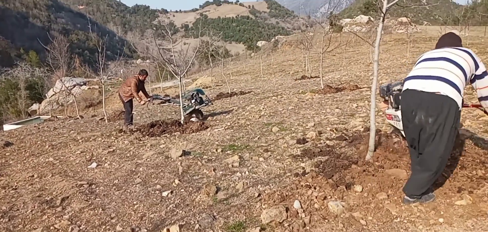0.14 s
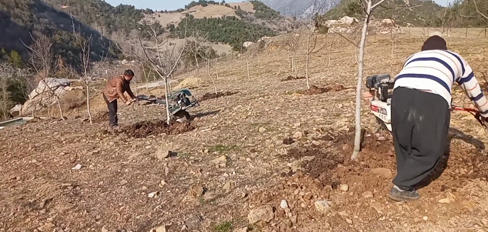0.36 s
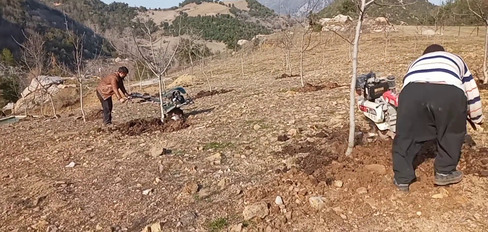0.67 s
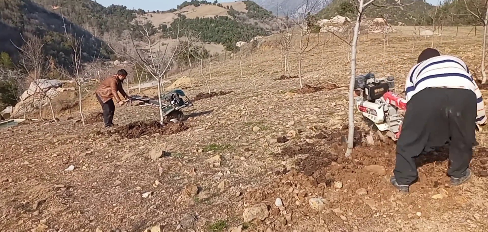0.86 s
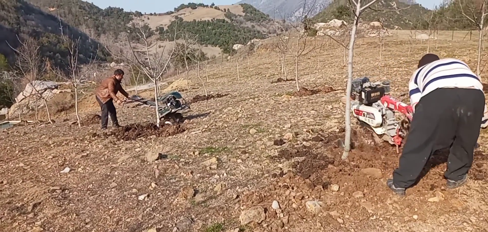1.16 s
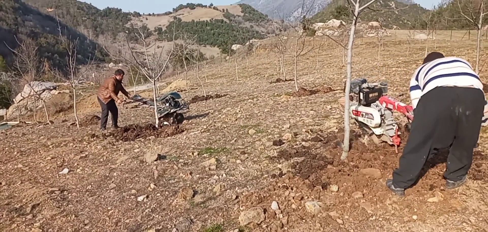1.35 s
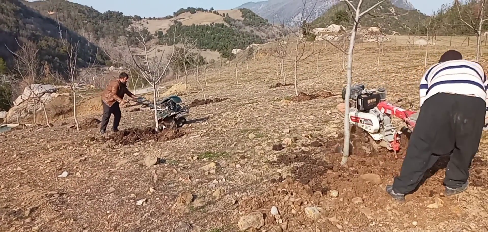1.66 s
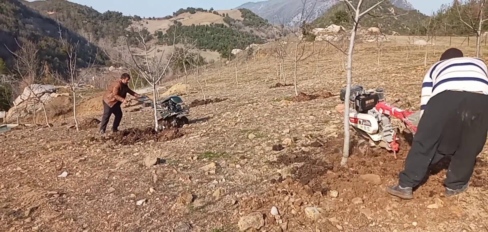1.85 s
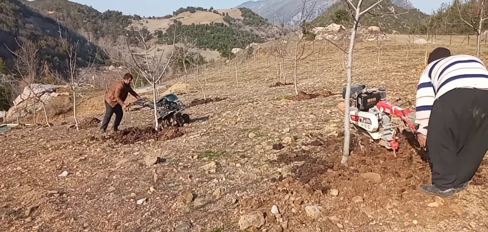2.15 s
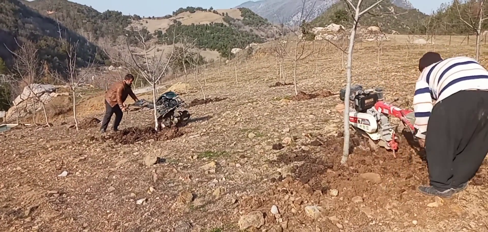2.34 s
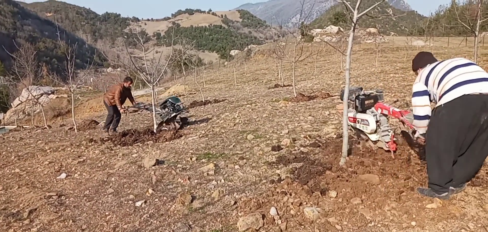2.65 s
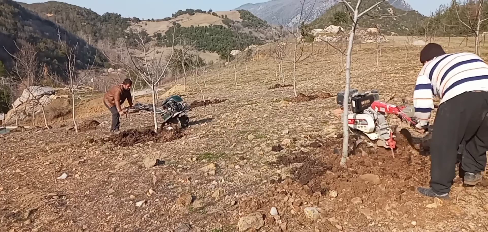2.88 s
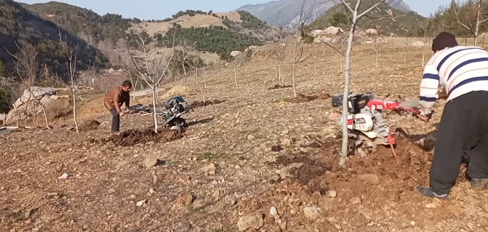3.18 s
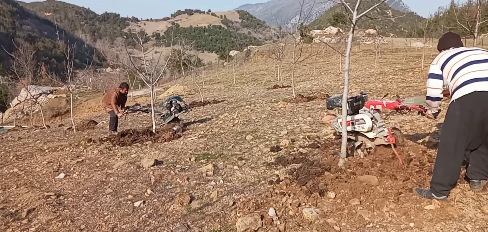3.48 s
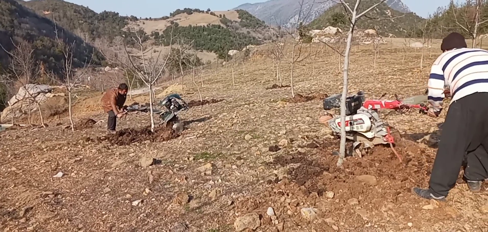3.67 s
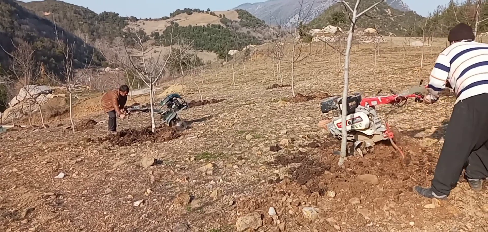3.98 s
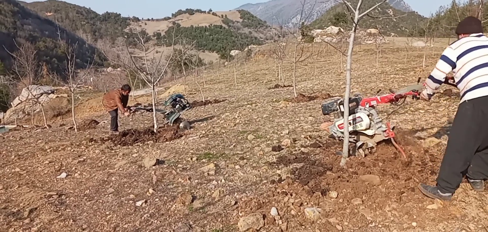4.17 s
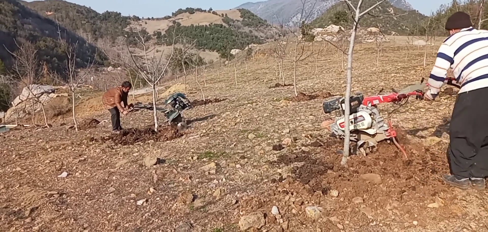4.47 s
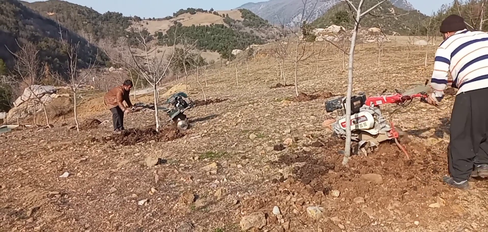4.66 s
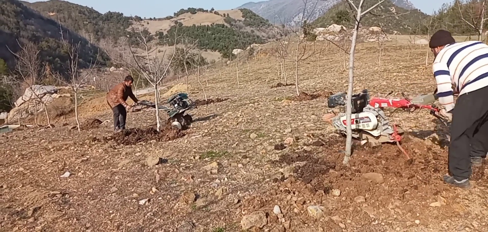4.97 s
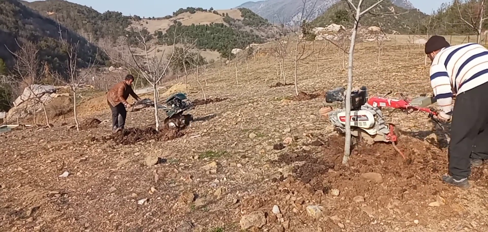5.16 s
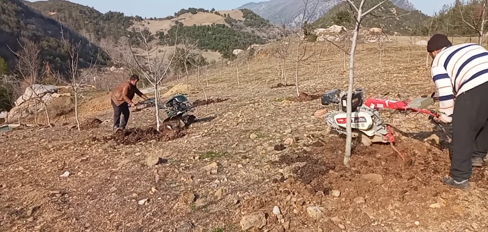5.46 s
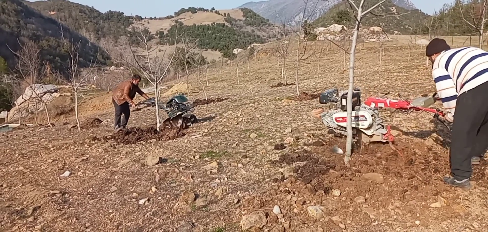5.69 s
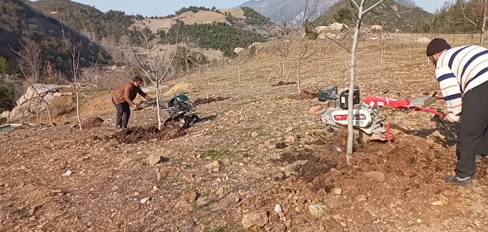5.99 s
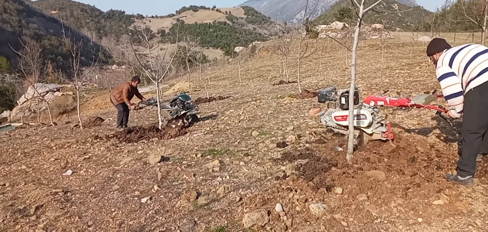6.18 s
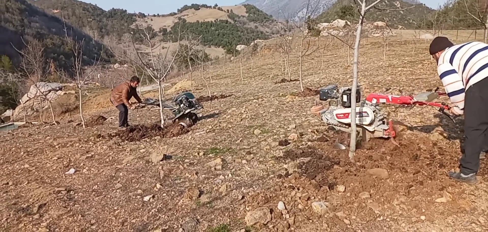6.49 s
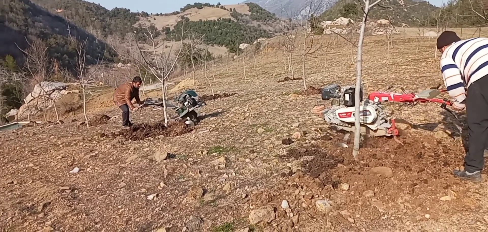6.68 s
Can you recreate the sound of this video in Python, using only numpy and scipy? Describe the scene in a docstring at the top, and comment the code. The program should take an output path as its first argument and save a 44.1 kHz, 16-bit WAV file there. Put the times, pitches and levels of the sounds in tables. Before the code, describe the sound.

Outdoors, a close tilling machine drones without pause, its rapid exhaust puffs fused into a rough low hum with dry casing clatter on top. Grainy earth hisses constantly, swelling in short crunches, with small steel clinks scattered irregularly. Behind it a second tiller wavers slightly in speed, so the two drones beat together. Diffuse roar off the slope fills the background; handheld stereo pickup.

```python
"""A stony hillside dug by two small single-cylinder four-stroke tillers, one near and one far. The near one
fires steadily: exhaust puffs sound through its pipe, and knock and rattle ring its casing as it swings round a
tree. The far one hunts under load, and its exhaust carries across. Soil hisses over the tines, clods burst,
stones make the steel clink, and the slope returns a blurred roar."""
import sys
import numpy as np
from scipy import signal
from scipy.fft import rfft, irfft, next_fast_len
from scipy.io import wavfile
from scipy.ndimage import uniform_filter1d

SR = 44100
rng = np.random.default_rng(int(sys.argv[2]) if len(sys.argv) > 2 else 0)


def materialize(psi):
    """Save the field psi as 16-bit PCM at rate SR to the path in sys.argv[1].

    A 1-D psi becomes a single channel; in a 2-D psi each row is a channel.
    """
    bounded = np.clip(np.atleast_2d(psi).T, -1, 1)
    quanta = np.round(bounded * 32767).astype(np.int16)
    wavfile.write(sys.argv[1], SR, quanta)


def volts_from_decibels(level):
    """Turn decibel levels (scalar or array-like) into linear amplitude factors."""
    exponent = np.asarray(level, float) / 20
    return 10 ** exponent


N = 301183  # samples

# speed of the near engine: time_s, firings_per_s
NEAR_SPEED = [(0.0, 26.179), (1.875, 26.076), (2.0, 26.224), (2.375, 26.031), (2.625, 26.274),
              (3.875, 26.387), (4.0, 26.637), (4.625, 26.383), (5.5, 26.112), (6.83, 26.117)]
# speed of the far engine, hunting: time_s, firings_per_s
FAR_SPEED = [(0.0, 25.067), (1.125, 24.386), (1.5, 25.025), (1.625, 24.343), (2.0, 25.686), (2.375, 25.161),
             (2.625, 23.983), (2.875, 25.143), (3.0, 24.59), (3.875, 25.237), (4.125, 24.557),
             (4.5, 25.431), (4.625, 24.793), (5.25, 25.25), (5.625, 24.313), (6.0, 24.887), (6.375, 24.332),
             (6.83, 25.047)]
# near exhaust pipe: frequency_hz, order_rms_db (before the turning of the machine)
NEAR_EXHAUST_PIPE = [(20, -105), (52, -34.5), (78, -25.5), (105, -37), (131, -27), (157, -36), (183, -32.5),
                     (210, -53.5), (262, -58), (288, -43), (327, -57.5), (380, -47.5), (470, -51),
                     (700, -34.5)]
# far exhaust pipe: frequency_hz, order_rms_db
FAR_EXHAUST_PIPE = [(25, -91.5), (50, -59), (100, -45.5), (124, -37.5), (149, -28.5), (174, -41),
                    (199, -50), (224, -34.5), (248, -39), (275, -62), (350, -68), (500, -82)]
# blows within a near cycle, valves then firing: place_cycles, relative_blow_db, bottom_hz, top_hz,
# relative_rattle_db, decay_s, share_of_path_shift
CYCLE_BLOWS = [(.272, 0, 720, 1250, -3, .002, 0), (.809, 1.5, 720, 1250, -1, .002, 1),
               (.842, -1, 1100, 1600, -4, .003, 0), (.95, -1, 720, 1500, -2, .009, .3)]
# casing colour, one list for each of three sides: frequency_hz, relative_density_db_per_hz
CASING_SIDES = [
    [(260, -9), (390, -14), (860, -1.5), (990, -2.5), (1380, 8), (1510, -1), (1680, 7), (2110, 2),
     (2580, -3.5), (2890, 3), (3190, -2), (3700, -2), (3960, -13.5), (4260, -27)],
    [(260, -4), (390, -10), (560, 2.6), (860, 3), (1380, 3.5), (1510, 2.5), (1810, 5.5), (2110, 1),
     (2710, -1), (3010, 4.5), (3490, -6.5), (3620, -1.5), (4010, -19), (4260, -19.5)],
    [(260, 2), (390, -11), (560, 0), (900, 0), (1210, 6), (1510, 10), (1890, 2), (2020, 19.5), (2370, 5),
     (2670, 2), (2930, 5), (3660, -1.5), (4010, -18), (4260, -11)],
]
# the near tiller swings round the tree: time_s, side_shown (0 to 2), casing_db, path_shift_cycles, exhaust_gain_db
TURNING = [(0, 1, -18.5, 0, .5), (.45, .3, -18, 0, 1.5), (1.1, .1, -17.5, 0, -.5),
           (2.0, .05, -17.5, -.004, 0), (3.0, .05, -17.5, -.024, -.5), (3.5, .85, -17.5, -.036, -.5),
           (4.2, 1, -18, -.037, 1), (5.1, 1.05, -17.5, -.037, -1), (5.4, 1.55, -18, -.037, -.5),
           (6.83, 1.45, -17.5, -.038, -1)]
# panels that ring under the blows: frequency_hz, width_hz, then for each side in turn
# side_0_db, side_1_db, side_2_db (relative to the casing)
RINGING_PANELS = [(926, 76, -10, -14, -8.5), (1083, 28, -44, -10, -24), (1271, 160, -3.5, -9, -27),
                  (1158, 80, -23, -11, -5), (1413, 9.7, -9, -8, -25), (1616, 214, -13, -3.5, -4.5),
                  (2104, 11.5, -15.5, -10, -23), (2046, 72, -26, -35, 6)]
# colour of soil on the tines: frequency_hz, relative_density_db_per_hz
SOIL_COLOUR = [(4050, -2), (4910, 1.5), (6460, -10), (7060, -16.5), (7670, -5), (8440, -23), (9910, -23.5),
               (10420, -24), (11020, -10.5), (13780, -8), (14900, 3), (15680, -1), (15760, -11),
               (15930, -39)]
# base level of soil on the tines: time_s, hiss_db, fizz_db
SOIL_LEVEL = [(0, -40, -43.5), (.3, -41.5, -39), (.9, -40, -40.5), (1.6, -43.5, -43.5), (2.2, -41, -41),
              (2.7, -41.5, -41.5), (3.2, -42.5, -43.5), (3.85, -43.5, -42.5), (4.3, -40.5, -39),
              (4.9, -41.5, -44), (5.6, -40, -40.5), (6.83, -41, -41.5)]
# clods bursting on the tines: peak_s, hiss_rise_db, fizz_rise_db
CLOD_BURSTS = [(.26, -1, -2), (.3, 8, 3), (.41, 3, 2), (1.4, 6.5, 2), (1.75, 4, 2), (1.935, 1, 3),
               (2.035, 6.5, 2), (2.37, 2, 4), (3.29, 3, 6), (4.09, 0, 4), (5.075, 2, 4), (5.2, 3, 4),
               (5.475, 4, 7), (5.62, 6, 4), (6.29, 3, 3), (6.345, 4, 3), (6.49, 5, 4), (6.52, 4, 2)]
# wash of both machines off the slope: frequency_hz, relative_density_db_per_hz
SLOPE_COLOUR = [(20, -18), (60, -14), (120, 13.5), (230, 12.5), (330, -8.5), (500, -18), (1000, -2.5),
                (2000, 2), (4000, -36), (6000, -27)]
# modes of the tine steel: frequency_hz, t60_s, group (0 low, 1 mid, 2 high), relative_db
TINE_MODES = [(2110, 0.23, 0, 11), (3360, 0.22, 1, 24), (3650, 0.19, 1, 25), (4880, 0.16, 2, 22)]
# stones on the tines: start_s, relative_mid_db, relative_low_db, relative_high_db
STONE_STRIKES = [(0.2962, -53, -38, -61), (.328, -51, -27.5, -54), (.392, -48.5, -35, -49),
                 (0.5646, -54, -31, -52), (0.9472, -50, -32, -54), (1.9194, -64, -41, -51),
                 (2.3645, -53, -34, -54), (2.4803, -49, -30, -53), (3.0879, -52, -29, -53),
                 (3.3932, -56, -33, -58), (4.5216, -58, -22.5, -55), (5.0624, -48, -26, -49),
                 (5.1964, -51, -34, -50), (5.4799, -49, -43, -53), (5.864, -44, -35, -58),
                 (5.896, -45, -37, -56), (6.2791, -59, -33, -48), (6.321, -45, -26, -51),
                 (6.5216, -57, -32, -46)]
# level between the microphone ports: frequency_hz, left_over_right_db
PORT_LEVEL = [(90, 4.5), (690, 0.65), (1720, 9.5), (2500, -1), (3100, 10.5), (7060, -11.5), (7670, 6.5),
              (8530, -7), (9560, -10.5), (10420, 55), (10940, 25), (11710, 20), (13950, 16.9), (15760, 4)]
# likeness of the ports: frequency_hz, likeness (0 to 1)
PORT_LIKENESS = [(90, 1), (1210, 0.85), (2410, 0.64), (3700, 1), (4220, 0.45), (4910, 0.87), (6980, 0.23),
                 (8010, 1), (8610, 0.94), (9560, 1), (10420, 0.14), (15760, 0.16)]
# phase between the ports: frequency_hz, radians beyond the plain delay
PORT_PHASE = [(90, 0.16), (1460, 0.018), (2240, 1.9), (2580, 4.34), (3700, 6.7), (4220, 3.9), (4310, 4.2),
              (5250, 6.7), (6720, 3.5), (7670, 5.1), (8530, 5.5), (8960, 23)]

NEAR_START = -.0255  # cycles already turned
REPEATING = .43  # share of the direct casing power that is driven by the shudders
ECHO_DB = -10  # echoes of a blow within the block
CLOD_RISE_S, CLOD_FALL_S = 0.0082, 0.042
LEFT_LAG = 37  # samples
SIZE = next_fast_len(N + 8192)  # transform length, samples
HZ = np.fft.rfftfreq(SIZE, 1 / SR)
T = np.arange(N) / SR  # s


def evened(x):
    """Normalisation: scales a signal to rms 1."""
    return x / np.sqrt(np.mean(x ** 2))


def read(points, hz):
    """Logarithmic frequency scale: joins the points of a spectrum by straight lines along it."""
    f, value = np.transpose(points)
    return np.interp(np.log(hz + 1), np.log(f + 1), value)


def colour(x, points):
    """Minimum-phase filtering: in a causal filter the phase follows from the gain."""
    hz = abs(np.fft.fftfreq(8192, 1 / SR))
    closed = points + [(points[-1][0] * 1.5, -160)]  # silent above the last point
    log_gain = np.log(volts_from_decibels(read(closed, hz)))
    response = np.exp(np.conj(signal.hilbert(log_gain)))
    taps = np.fft.ifft(response).real[:4096]
    taps *= signal.windows.hann(8192)[4096:]
    taps = taps.reshape((1,) * (x.ndim - 1) + (-1,))
    return signal.oaconvolve(x, taps, axes=-1)[..., :N]


def resonate(x, hz, width):
    """Damped resonance: one two-pole mode, struck softly."""
    r = np.exp(-np.pi * width / SR)
    soft = signal.sosfilt(signal.butter(4, 2 * hz, fs=SR, output="sos"), x)
    return signal.lfilter([1, 0, -1], [1, -2 * r * np.cos(2 * np.pi * hz / SR), r * r], soft)


def turns(speed, start=0.):
    """Phase as the integral of frequency: engine cycles gone by."""
    return start + np.cumsum(np.interp(T, *np.transpose(speed))) / SR


def blows(cycles, place, spread_db, jitter_s):
    """Near-periodic impulse train: one click per cycle, a little uneven in size and time."""
    at = np.flatnonzero(np.diff(np.floor(cycles - place))) + 1
    chance = rng.standard_normal((200, 2))[:len(at)]
    shift = np.round(jitter_s * SR * chance[:, 0]).astype(int)
    out = np.zeros(N)
    out[np.clip(at + shift, 0, N - 1)] = volts_from_decibels(spread_db * chance[:, 1])
    return out


def exhaust(cycles, pipe, place, spread_db, jitter_s):
    """Harmonic excitation of a pipe: each firing puffs, and each order leaves at the pipe's level."""
    samples_per_cycle = N / (cycles[-1] - cycles[0])
    puffs = blows(cycles, place, spread_db, jitter_s)
    # a unit click per cycle has orders of rms sqrt(2) / samples_per_cycle
    return colour(puffs, pipe) * samples_per_cycle / np.sqrt(2)


def knocking(cycles):
    """Periodic impact: shudders that repeat each cycle, and the decaying power of the rattle they set off."""
    time_s, _, _, path_shift, _ = np.transpose(TURNING)
    shudders, rattle, t = np.zeros(N), np.zeros(N), T[:SR // 20]
    for place, blow_db, bottom_hz, top_hz, rattle_db, decay_s, moved in CYCLE_BLOWS:
        shifted = place + moved * np.interp(T, time_s, path_shift)
        hit = blows(cycles, shifted, spread_db=.8, jitter_s=.00002)
        # the blow itself, then sparse echoes of either sign within the block
        signs = rng.choice([-1., 1.], len(t))
        sparse = rng.random(len(t)) < .04
        echoes = volts_from_decibels(ECHO_DB) * signs * sparse * np.exp(-t / decay_s)
        echoes[0] = 1
        band = signal.butter(2, [bottom_hz, top_hz], "band", fs=SR, output="sos")
        shape = signal.sosfilt(band, echoes / np.linalg.norm(echoes))
        shudders += volts_from_decibels(blow_db) * signal.oaconvolve(hit, shape)[:N]
        decay = np.exp(-1 / (decay_s * SR))
        rattle += volts_from_decibels(2 * rattle_db) * signal.lfilter([1], [1, -decay], hit ** 2)  # power
    rattle = abs(uniform_filter1d(rattle, 30))
    return shudders, rattle / rattle.mean()


def casing(shudders, rattle, steady=1.0):
    """Forced vibration and directivity: blows ring casing and panels, coloured by the side that is shown."""
    time_s, side, level_db, _, _ = np.transpose(TURNING)
    side = np.clip(np.interp(T, time_s, side), 0, 2)
    loose, scattered = evened(np.sqrt(steady + rattle)) * rng.standard_normal((2, N))
    closed = [[(150, -40.5)] + points + [(4700, -32.5)] for points in CASING_SIDES]
    parts = []
    for drive in (shudders, loose, scattered):
        body = np.zeros(N)
        for k, points in enumerate(closed):
            share = np.clip(1 - abs(side - k), 0, 1)  # crossfade between neighbouring sides
            body += share * colour(drive, points)
        body = evened(body)
        for hz, width, *side_db in RINGING_PANELS:
            gain = volts_from_decibels(np.interp(side, range(3), side_db))
            body += gain * evened(resonate(drive, hz, width))
        parts.append(evened(body))
    direct = np.sqrt(REPEATING) * parts[0] + np.sqrt(1 - REPEATING) * parts[1]
    return volts_from_decibels(np.interp(T, time_s, level_db)) * np.array([direct, parts[2]])


def scrape(rattle, steady=0.8, lumpy_db=1.2, fizz_lumpy_db=1.9, grit_db=0.5, grit_per_s=2500):
    """Granular friction noise: soil hisses in lumps, shaken by each blow, and bursting clods swell it briefly."""
    present = rng.random((2, N)) < grit_per_s / SR
    grit = volts_from_decibels(grit_db * rng.exponential(1, (2, N))) * present
    hiss = evened(grit * rng.standard_normal((2, N))) * 0.34 + rng.standard_normal((2, N))
    lumps = rng.standard_normal((2, N))
    for _ in range(2):
        lumps = uniform_filter1d(lumps, 1200)
    lumps = evened(lumps)
    shaken = hiss * np.sqrt(steady + uniform_filter1d(rattle, 100))
    time_s, hiss_db, fizz_db = np.transpose(SOIL_LEVEL)
    level_db = np.array([np.interp(T, time_s, hiss_db) + lumpy_db * lumps[0],
                         np.interp(T, time_s, fizz_db) + fizz_lumpy_db * evened(lumps.sum(0))])
    for at, *rise_db in CLOD_BURSTS:
        swell = np.interp(T, [at - CLOD_RISE_S, at, at + CLOD_FALL_S], [0, 1, 0])
        level_db += np.outer(rise_db, swell)
    low = evened(colour(shaken, [(3300, -60)] + SOIL_COLOUR[:8]))
    high = evened(colour(shaken, [(8000, -70)] + SOIL_COLOUR[7:] + [(16100, -110)]))
    return volts_from_decibels(level_db[0]) * low + volts_from_decibels(level_db[1]) * high


def wash(level_db=-30):
    """Diffuse reflection: the slope returns the engines' roar blurred into coloured noise."""
    return volts_from_decibels(level_db) * evened(colour(rng.standard_normal((2, N)), SLOPE_COLOUR))


def stones(ring_db=-5, rise_s=0.00058):
    """Free vibration: a stone strikes a tine, whose modes ring on and decay exponentially."""
    t, out = T[:SR // 2], np.zeros(N + SR)
    for start_s, mid_db, low_db, high_db in STONE_STRIKES:
        for hz, t60, group, mode_db in TINE_MODES:
            peak_db = ring_db + mode_db + (low_db, mid_db, high_db)[round(group)]
            envelope = volts_from_decibels(peak_db - 60 * t / t60) * (1 - np.exp(-(t / rise_s) ** 2))
            out[round(start_s * SR):][:len(t)] += envelope * np.sin(2 * np.pi * hz * t)
    return out[:N]


def scene():
    """Superposition: row 0 is what reaches both ports, row 1 scattered sound for the right port."""
    near, far = turns(NEAR_SPEED, NEAR_START), turns(FAR_SPEED)
    shudders, rattle = knocking(near)
    out = casing(shudders, rattle) + scrape(rattle) + wash()
    facing = volts_from_decibels(np.interp(T, *np.transpose(TURNING)[[0, 4]]))
    out[0] += facing * exhaust(near, NEAR_EXHAUST_PIPE, place=.27, spread_db=.6, jitter_s=.00005)
    out[0] += exhaust(far, FAR_EXHAUST_PIPE, place=0.3035, spread_db=0.5, jitter_s=0.00067)
    out[0] += stones()
    return out


def top_cut(x):
    """Nothing passes above the cut-off."""
    return signal.sosfilt(signal.butter(12, 17100, fs=SR, output="sos"), x)


def record(dry):
    """Interaural-like difference: the right port differs in level and phase and takes in scattered sound."""
    direct, scattered = rfft(dry, SIZE)
    same = np.clip(read(PORT_LIKENESS, HZ), 0, 1)
    lead = np.exp(1j * (2 * np.pi * HZ * LEFT_LAG / SR + read(PORT_PHASE, HZ)))
    mixed = same * lead * direct + np.sqrt(1 - same ** 2) * scattered  # power is kept
    right = irfft(mixed / volts_from_decibels(read(PORT_LEVEL, HZ)), SIZE)[:N]
    return top_cut(np.array([dry[0], right]))


dry = scene()
out = record(dry)
materialize(out)
```